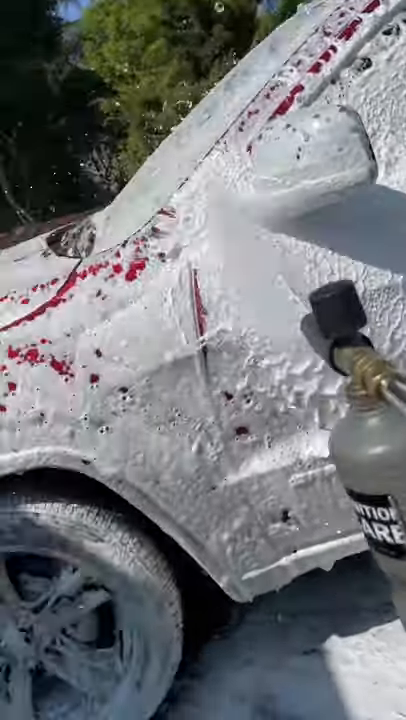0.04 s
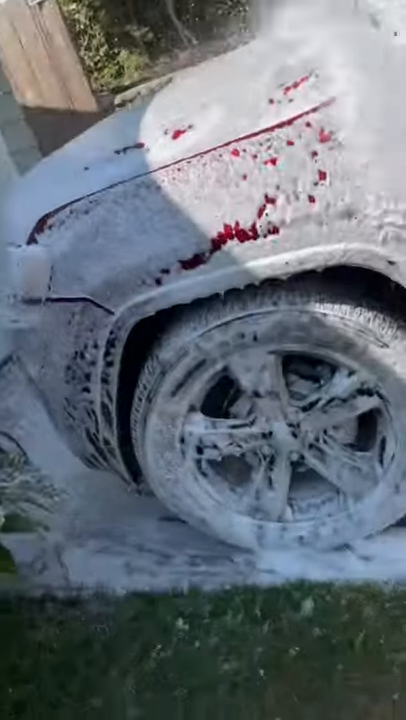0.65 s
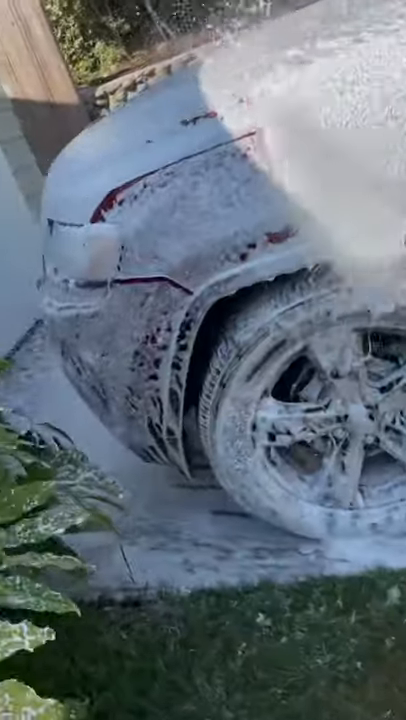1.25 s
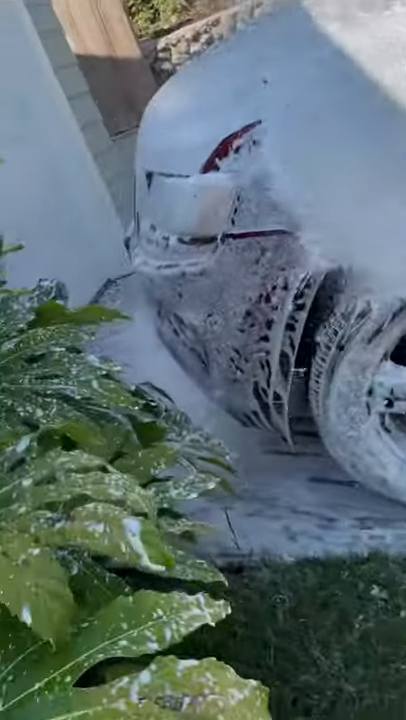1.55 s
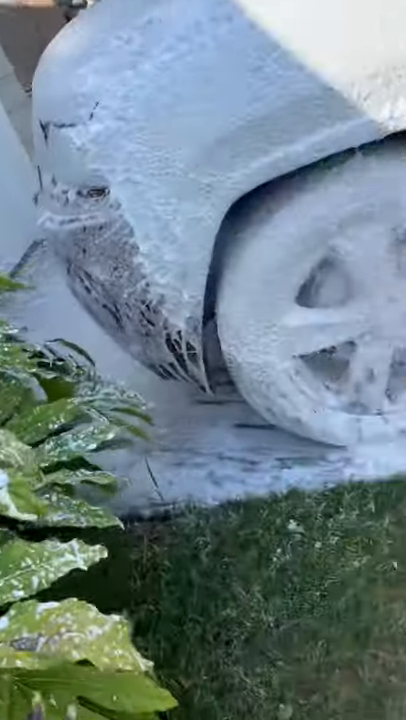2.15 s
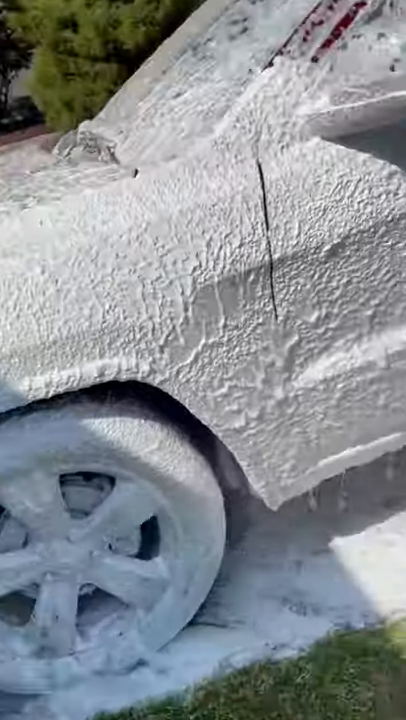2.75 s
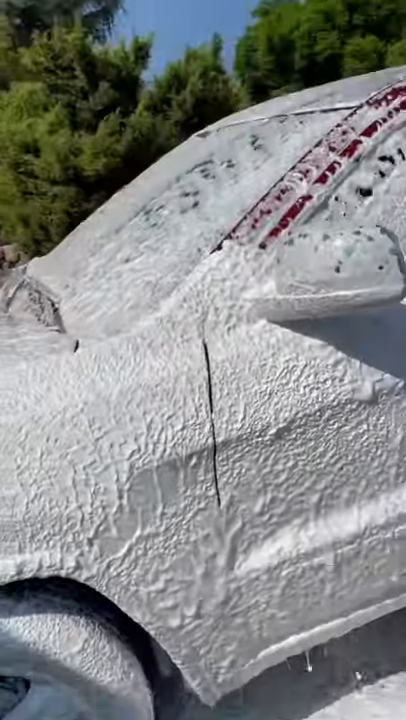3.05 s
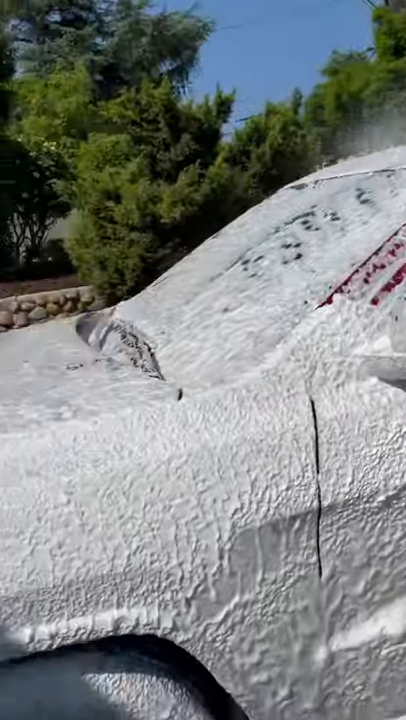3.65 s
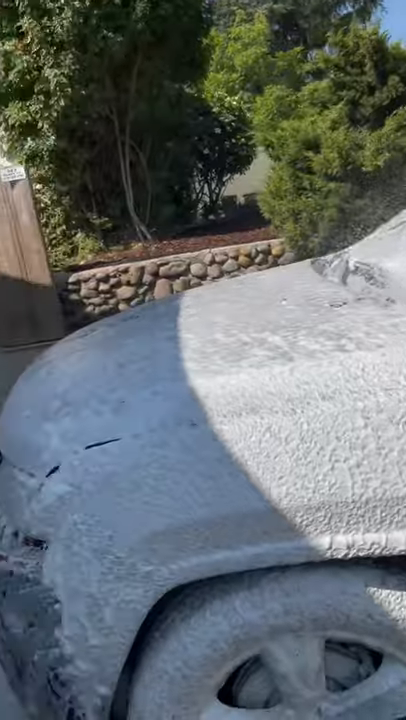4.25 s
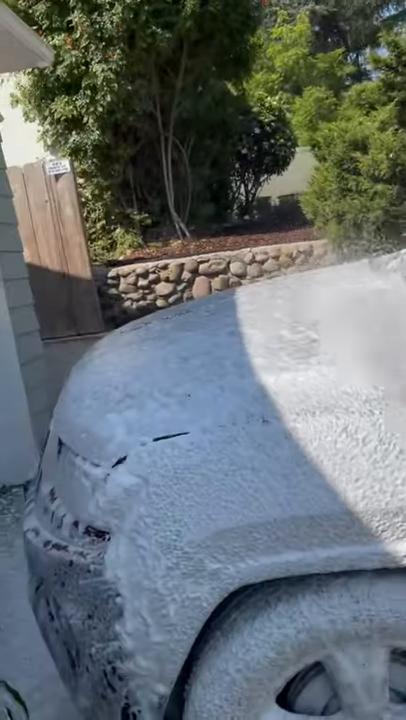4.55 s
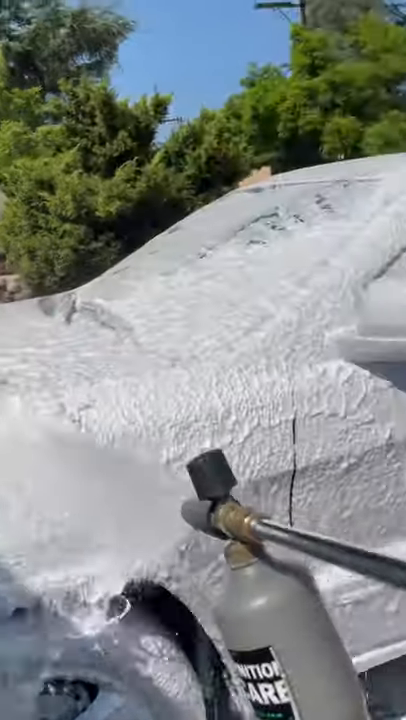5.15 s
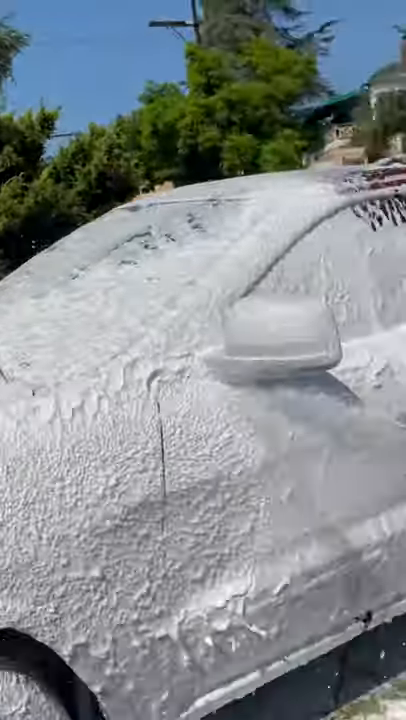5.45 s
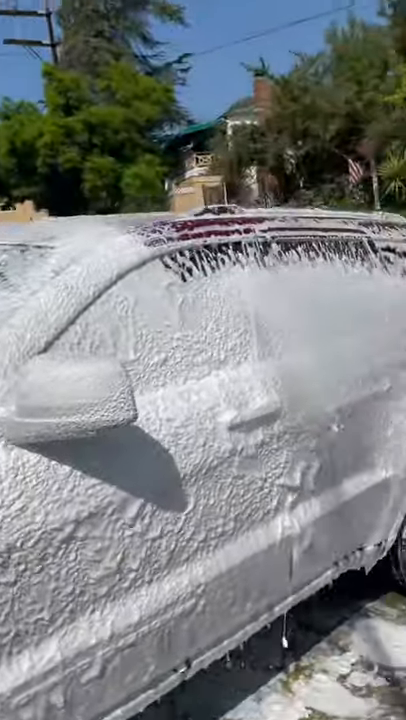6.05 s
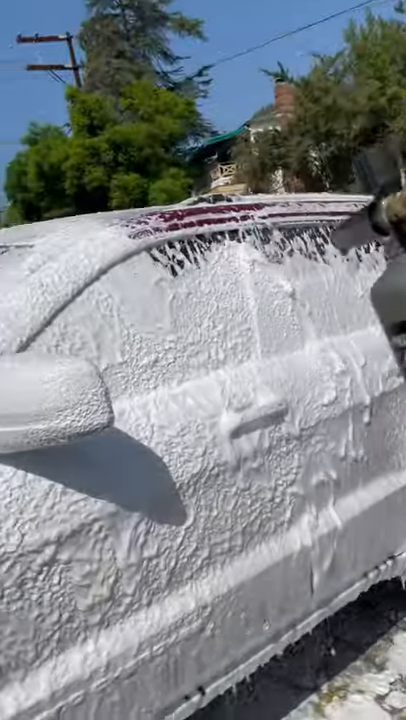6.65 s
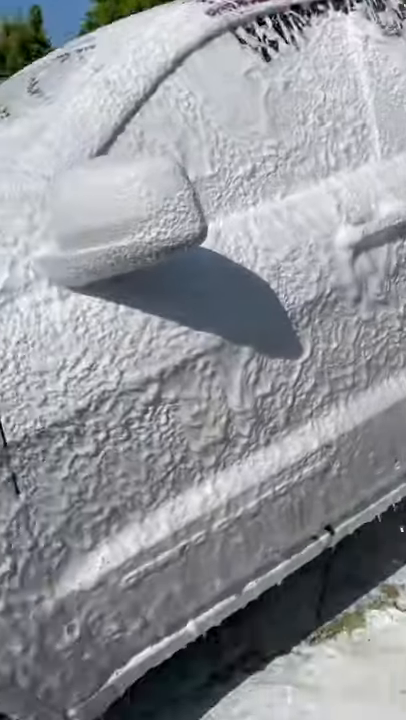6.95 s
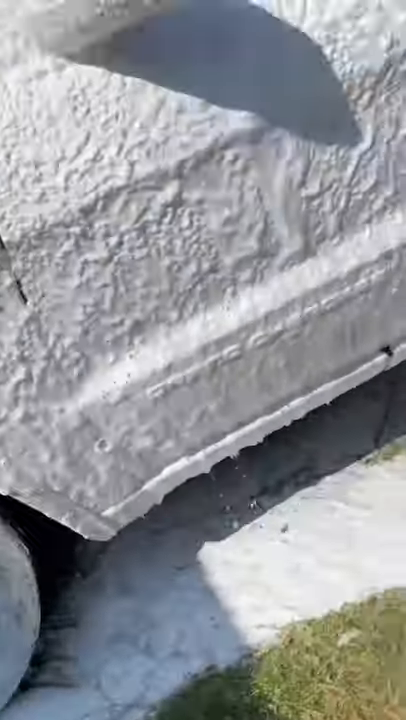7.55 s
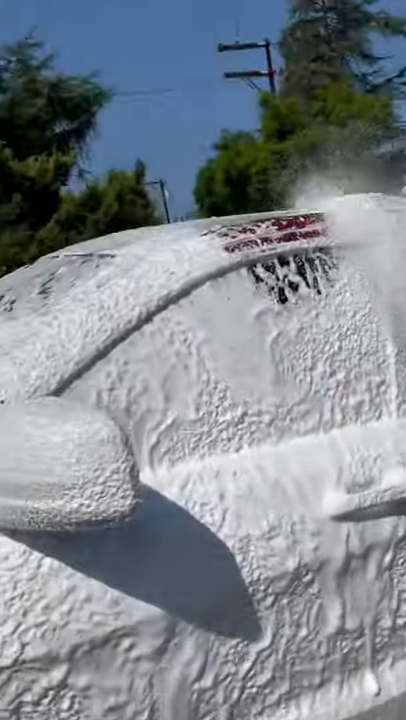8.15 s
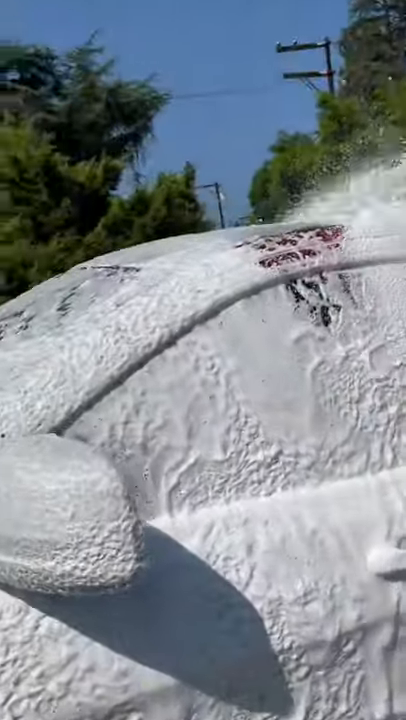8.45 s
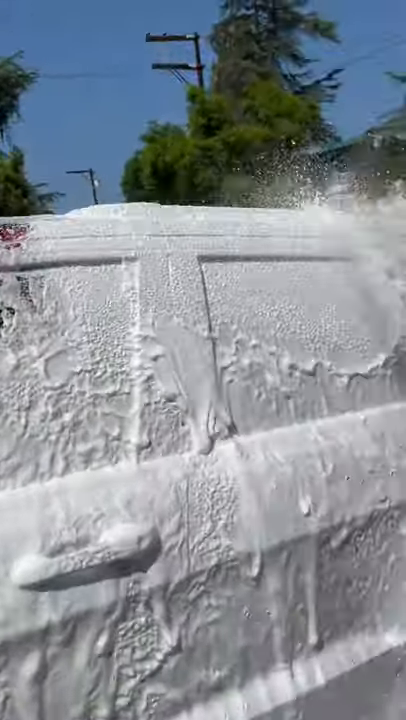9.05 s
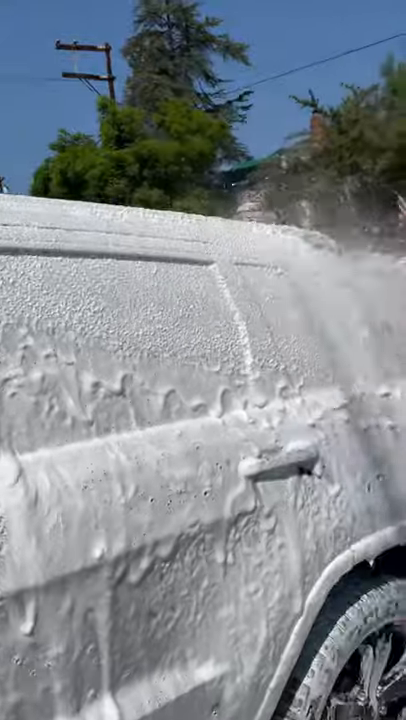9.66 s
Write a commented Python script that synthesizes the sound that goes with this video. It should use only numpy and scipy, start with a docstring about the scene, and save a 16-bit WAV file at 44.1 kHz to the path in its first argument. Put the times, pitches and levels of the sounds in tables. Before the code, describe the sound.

Foam hisses and roars against car panels, stopping twice with a trigger knock while a petrol engine chugs and races.

```python
"""A jet of foam roars and hisses over a car while a petrol pressure washer drones behind it.
The jet rushes through a hand-held lance, drums on the panels and breaks into mist; the one-cylinder
engine chugs and its pump whines. Twice the trigger is let go: the valve knocks, the spray dies away
and the engine, freed of its load, races until the trigger is squeezed again."""
import sys
import numpy as np
from scipy import signal
from scipy.fft import rfft, irfft, next_fast_len
from scipy.io import wavfile
from scipy.ndimage import uniform_filter1d

SR = 44100
rng = np.random.default_rng(int(sys.argv[2]) if len(sys.argv) > 2 else 0)


def materialize(psi):
    """Save the field psi as 16-bit PCM at rate SR to the path in sys.argv[1].

    A 1-D psi becomes a single channel; in a 2-D psi each row is a channel.
    """
    bounded = np.clip(np.atleast_2d(psi).T, -1, 1)
    quanta = np.round(bounded * 32767).astype(np.int16)
    wavfile.write(sys.argv[1], SR, quanta)


N = 431738
TIME = np.arange(N) / SR
SIZE = next_fast_len(N)
FREQS = np.maximum(np.arange(SIZE // 2 + 1) * SR / SIZE, 1)
LOADED_HZ, UNLOADED_HZ = 30.07, 31.72   # engine firings per second
PASS_S = 5.115   # the lance sweeps right past the listener
# Level changes at four places: bonnet, front door, rear door, roof.
ENGINE_BY_PLACE_DB, ROAR_BY_PLACE_DB = (-4, -0.5, 1.5, 2), (0, 1.5, 3, 2.5)


# The hiss changes as the lance swings about: (time [s], nozzle level [dB], mist level [dB])
HISS_LEVELS = [(0, -31, -26.5), (0.4, -31.5, -31), (1.15, -31, -24.5), (1.75, -32, -26),
               (2.25, -36.5, -35.5), (3.2, -35.5, -34.5), (3.65, -31.5, -29), (4.15, -32, -30),
               (4.6, -28, -29.5), (5.05, -23.5, -38), (5.22, -26, -48), (5.43, -31.5, -56),
               (5.52, -30, -43), (5.65, -33.5, -46), (6.3, -32, -36), (8.0, -36, -30), (8.37, -30, -25),
               (8.7, -30.5, -28.5), (9.79, -31.5, -30)]

def spray(cycles):
    """The whole jet, pulsing with the pump; `cycles` counts the engine's firings so far."""
    nozzle_db, mist_db = in_time(HISS_LEVELS)
    splashing = splash()
    sputter = drift(17)
    wash = (roar(cycles) + splashing + flecks()) * from_db([[-.9], [-.1]])   # left, right
    wash *= flow(hold_s=.0052, remaining=.55, fade_s=.14, spurt=.85, drain_per_s=.43, build_s=.15)
    hiss = nozzle(nozzle_db + .5 * sputter) + mist(mist_db + .8 * sputter)
    return stray_echoes(bodywork_echo(wash + hiss * throb(cycles, .026)))

# The tone of the rush inside the foam gun: (frequency [Hz], level [dB])
GUN_SPECTRUM = [(60, -41), (200, -10.5), (450, 0), (800, -1), (1150, -0.5), (1480, 3.5), (1640, 3),
                (1820, 4), (2100, 1), (2600, 0.5), (3200, -4), (5000, -20), (9000, -61)]
# The tone of the broad door panels: (frequency [Hz], level [dB])
DOOR_SPECTRUM = [(100, -24), (300, -11.5), (500, 2.5), (680, -4.5), (900, -0.5), (1450, 1), (1900, -8),
                 (3500, -34)]

def roar(cycles):
    """Foam rushes through the gun and drums on the doors, pushed in pulses by the pump."""
    drumming = from_db(-5) * by_place([0, 1, 1, 1]) * stereo_noise(DOOR_SPECTRUM, grain_db=3)
    gain = from_db(-31 + by_place(ROAR_BY_PLACE_DB) + .5 * drift(5.5))
    rush = stereo_noise(GUN_SPECTRUM, grain_db=1)
    pulsing = throb(cycles, .1) * throb(2 * cycles, .032) * throb(4 * cycles, .03)
    pistons = throb(6 * cycles, .022)   # three pump strokes to each turn of the crank
    return gain * (rush + chamber() + drumming) * pulsing * pistons

# The mixing chamber's note wanders as foam fills it: (time [s], pitch [Hz], level against the rush [dB])
CHAMBER_NOTE = [(0, 1660, -11), (1, 1660, -14), (1.9, 1570, -10), (2.4, 1680, -8.5), (3.5, 1660, -8),
                (4.05, 1568, -9), (4.4, 1610, -5), (4.9, 1692, -7.5), (5.35, 1632, -6), (6.1, 1610, -13),
                (8.4, 1620, -11.5), (9.1, 1630, -9), (9.79, 1600, -16)]

def chamber():
    """The jet keeps the mixing chamber ringing and the brass parts singing faintly."""
    hz, db = in_time(CHAMBER_NOTE)
    return from_db(db) * narrow_band(hz, width_hz=44) + from_db(-21) * narrow_band(2510, width_hz=55)

# The nozzle's tone from a distance: (frequency [Hz], level [dB])
NOZZLE_FAR_SPECTRUM = [(900, -12), (2200, 4.5), (3200, 4.5), (4000, 6.5), (5100, 5), (6000, 4.5),
                       (6700, -3), (8500, -42), (13000, -4.5)]
# The nozzle's tone up close: (frequency [Hz], level [dB])
NOZZLE_NEAR_SPECTRUM = [(1200, -3), (2400, -0.5), (3100, 1.5), (4200, -4), (5000, 1), (5800, 3),
                        (7200, -4.5), (9000, -4), (13000, -5.5), (15700, -2.5)]

def nozzle(level_db):
    """The jet hisses as it leaves the nozzle, changing tone as it passes the listener."""
    near = swell(PASS_S, width_s=.8)
    far_hiss = np.sqrt(1 - near) * stereo_noise(NOZZLE_FAR_SPECTRUM, grain_db=1.44)
    near_hiss = np.sqrt(near) * stereo_noise(NOZZLE_NEAR_SPECTRUM, grain_db=.7, focus=1)
    strength = flow(hold_s=.0079, remaining=.86, fade_s=.087, spurt=.91, drain_per_s=.08, build_s=.14)
    return strength * from_db(level_db) * (far_hiss + near_hiss)

# The tone of the fine mist: (frequency [Hz], level [dB])
MIST_SPECTRUM = [(3000, -20), (5500, -6), (7000, 0), (10500, 0), (13200, -3), (15700, 3)]

def mist(level_db):
    """The jet breaks into mist with a high, flickering hiss."""
    strength = flow(hold_s=.037, remaining=.96, fade_s=.033, spurt=.24, drain_per_s=.08, build_s=.15)
    return strength * from_db(level_db + .77 * drift(19)) * stereo_noise(MIST_SPECTRUM, grain_db=.6)

# The tone of foam landing close by: (frequency [Hz], level [dB])
SPLASH_SPECTRUM = [(1200, -28), (2300, 2), (2900, -2), (3600, 1), (4300, -20), (8000, -36)]

def splash():
    """Foam splashes on the nearest panel just after the lance passes."""
    gain = from_db(-32) * swell(PASS_S + .16, width_s=.22)
    return gain * stereo_noise(SPLASH_SPECTRUM, grain_db=2.5, focus=.64)

# The tone of small slaps of foam: (frequency [Hz], level [dB])
FLECK_SPECTRUM = [(700, -20), (1800, 0), (2800, -3), (5000, -7), (7000, -8), (14000, -7)]

def flecks(hits_per_s=220, spread_db=6, decay_s=.0016):
    """Lumps of foam of uneven size hit the panels in flurries."""
    hits = rng.random(N) < hits_per_s * from_db(3 * np.tanh(drift(7))) / SR
    sizes = hits * from_db(spread_db * np.minimum(rng.exponential(1, N), 2))
    fades = signal.lfilter([1], [1, -np.exp(-1 / (decay_s * SR))], sizes + 1e-18)
    slaps = coloured(fades * rng.standard_normal(N), FLECK_SPECTRUM)
    return from_db(-41 + by_place(ROAR_BY_PLACE_DB)) * slaps

# The car's echo cuts a dip in the hiss: (time [s], frequency [Hz], level change [dB])
HISS_DIP = [(0, 3000, -3), (0.6, 2940, -11), (1.4, 3100, -10), (1.7, 3450, -3), (2.2, 3750, -0.5),
            (3.1, 3050, -3), (3.8, 3250, -2), (4.3, 3880, -4), (5.1, 4200, -2), (5.6, 3850, -2),
            (6.0, 3720, -8), (8.1, 3650, -5), (8.75, 3110, -1), (9.79, 3130, -1)]
# The jet favours one pitch of hiss: (time [s], frequency [Hz], level change [dB])
HISS_BOOST = [(0, 4900, 1.5), (2, 5050, 3), (3.3, 4500, 1), (4.3, 5100, 3), (5.0, 5400, 1.5),
              (5.9, 5170, 3.5), (8.3, 5100, 0.5), (9.79, 5280, 1.5)]

def bodywork_echo(x):
    """A dip and a peak glide through the spray as the lance moves along the panels."""
    hollowed = moving_peak(x, *in_time(HISS_DIP), width_hz=400)
    return moving_peak(hollowed, *in_time(HISS_BOOST), width_hz=320)

def stray_echoes(x, count=8, delay_range_s=(.0008, .007), share=.06):
    """Short echoes off glass, panels and paving come and go, so the tone keeps shifting."""
    lags = (rng.uniform(*delay_range_s, count) * SR).astype(int)
    echoes = sum(drift(1.5) * np.roll(x, lag, axis=-1) for lag in lags)
    return (x + share * echoes) / np.sqrt(1 + count * share ** 2)

def flow(hold_s, remaining, fade_s, spurt, drain_per_s, build_s):
    """Jet strength, 0-1: it drops and fades when let go, then spurts and builds up when squeezed."""
    strength = np.ones(N)
    for let_go, _, squeezed, _ in SPRAY_PAUSES:
        age = TIME - let_go - hold_s
        dying = np.where(age < 0, 1, remaining * np.exp(-np.maximum(age, 0) / fade_s))
        first_spurt = spurt * np.exp(-drain_per_s * (squeezed - let_go))   # the idle gun drains
        building = 1 - (1 - first_spurt) * np.exp(-np.maximum(TIME - squeezed, 0) / build_s)
        strength *= np.where(TIME < squeezed, dying, building)
    return strength


# The trigger stops the spray: (let-go time [s], knock level [dB], squeeze time [s], knock level [dB])
SPRAY_PAUSES = [(2.532, -20.5, 3.0296, -18.5), (6.332, -17.5, 7.925, -16)]
# The notes of the knocked lance: (pitch [Hz], level [dB], fade time [s])
LANCE_NOTES = [(685, -11, 0.024), (903, 2, 0.024), (1040, -5, .015), (1690, -20, 0.011)]
# Trigger and valve ticks: (time [s], level [dB], pitch [Hz], fade time [s], pitch spread [ratio])
TRIGGER_TICKS = [(2.531, -17, 1900, .014, 0.92), (2.628, -28, 2920, .016, 1),
                 (3.0277, -38, 4000, .012, 1.8), (3.0385, -28, 3500, 0.014, 1.1),
                 (6.327, -22, 2400, .014, 1.12), (6.331, -18, 1500, .012, 1.25),
                 (6.4215, -25, 4500, 0.017, 1.4), (7.9233, -24.5, 4700, .014, 1.15),
                 (7.9323, -22, 5000, 0.0072, 1.7), (7.595, -29, 1280, .05, 1.1)]

def trigger():
    """The trigger ticks, and each sudden change of pressure knocks through the lance."""
    shut = impulses([row[:2] for row in SPRAY_PAUSES])
    opened = impulses([row[2:] for row in SPRAY_PAUSES])
    knocks = sum(from_db(db) * (ring(opened, hz, t60) + ring(shut, hz * 1.01, t60))   # higher on shutting
                 for hz, db, t60 in LANCE_NOTES)
    # In the second pause the shut lance rings on briefly under the trapped pressure.
    groan = from_db(-38) * swell(6.58, width_s=.05) * narrow_band(955, width_hz=30)
    ticks = sum(burst(*row) for row in TRIGGER_TICKS)
    return knocks + groan + ticks

# The notes of the lance's brass parts: (pitch [Hz], level [dB], fade time [s])
BRASS_NOTES = [(1310, -5, .13), (1660, -8, .09), (2530, 0, .06), (3140, 0, .055), (4420, -10, .03),
               (5150, -8, .04), (5700, -7, .05)]
# The brass parts tap together in the hand: (time [s], level [dB], favoured pitch [Hz])
BRASS_TAPS = [(6.766, -31, 1310), (6.797, -32, 2530), (6.81, -33, 1400), (6.829, -31, 1700),
              (6.839, -33, 1900), (6.864, -29, 1490), (6.868, -36, 5300), (6.8952, -33, 3200),
              (6.9285, -30, 2510), (6.961, -33, 3620), (6.989, -39, 2700)]

def clinks(loss_db_per_octave=12):
    """Each tap starts with a short scrape and rings the brass notes, favouring those near its pitch."""
    ringing = np.zeros(N)
    for hz, note_db, t60 in BRASS_NOTES:
        taps = [(s, db + note_db - loss_db_per_octave * abs(np.log2(hz / favoured_hz)))
                for s, db, favoured_hz in BRASS_TAPS]
        ringing += ring(impulses(taps), hz, t60)
    scrapes = sum(burst(s, db - 6, hz, t60=.035, spread=1.65) for s, db, hz in BRASS_TAPS)
    return ringing + scrapes


def engine(cycles, speed):
    """A one-cylinder, four-stroke engine and its pump; `speed` is in firings per second."""
    load = np.clip((31.1 - speed) / .81, 0, 1)   # the speed rises as the load falls away
    exhaust = boom(cycles, speed) * from_db([[.3], [-.3]])
    exhaust += chug(cycles, speed, load) * from_db([[1.5], [-1.5]])
    machinery = from_db(by_place(ENGINE_BY_PLACE_DB)) * (rattle(cycles, load) + clatter(cycles))
    return machinery + whine(cycles, load) + rumble(cycles, speed) - exhaust

# The exhaust's boom under load, along the walk: (time [s], level [dB])
BOOM_LEVELS = [(0, -24), (1.0, -23.5), (1.6, -25), (2.5, -23.5), (3.55, -22), (4.6, -23), (5.3, -22.5),
               (6.35, -21), (8.4, -22), (9.79, -22.7)]

def boom(cycles, speed, throttle_lag_s=.065, drop_db_per_hz=1.76):
    """The exhaust booms at the crank's rate, two turns a firing; it softens as the throttle shuts."""
    boom_db, = in_time(BOOM_LEVELS)
    extra_hz = np.interp(TIME - throttle_lag_s, TIME, speed) - LOADED_HZ
    return np.sqrt(2) * from_db(boom_db + .6 - drop_db_per_hz * extra_hz) * np.cos(4 * np.pi * cycles)

# The exhaust's higher tones, by place and with no load:
# (pitch [times the firing rate], bonnet [dB], front door [dB], rear door [dB], roof [dB], no load [dB])
EXHAUST_TONES = [(3, -40.5, -38.5, -32.5, -32.5, -33), (4, -34, -30.5, -33.5, -34, -44.5),
                 (5, -41.5, -42, -39, -32, -41.5), (6, -36.5, -35.5, -32, -43, -38.5),
                 (7, -39.5, -42, -30.5, -41, -46), (8, -53, -50, -51, -45, -43.5),
                 (9, -47.5, -37.5, -42, -39, -40.5), (10, -48.5, -45.5, -54, -45, -40),
                 (11, -50.5, -41.5, -46, -34, -52), (12, -50, -52, -38, -40, -43.5),
                 (13, -40, -40.5, -31, -38, -41), (14, -62, -58, -51, -61, -49),
                 (15, -46.5, -41.5, -41, -41, -45), (16, -47, -38, -34, -36.5, -43),
                 (17, -51, -48, -48, -39, -57), (18, -44.5, -41, -47, -40, -65),
                 (19, -49, -48, -50, -45, -59), (20, -53, -46, -39, -53, -56)]

def chug(cycles, speed, load):
    """The lower exhaust tones stay in step and add up to one chug per firing."""
    racing = np.clip(speed - 32, 0, 1)
    shake = .05 + .03 * (1 - load) + .9 * racing   # racing with the throttle shut, it fires unevenly
    total = np.zeros(N)
    for multiple, *levels_db in EXHAUST_TONES:
        gain = tone_gain(multiple, levels_db, load) * (1 + shake * drift(10.5))
        total += gain * engine_tone(cycles, multiple, wander_db=1, scatter=min(.093 * multiple, 1))
    return total

# The pump's and gears' tones, by place and with no load:
# (pitch [times the firing rate], bonnet [dB], front door [dB], rear door [dB], roof [dB], no load [dB])
PUMP_TONES = [(21, -57, -62, -49, -52, -51), (23, -50, -56, -54, -46, -58), (24, -46, -43, -56, -46, -54),
              (26, -53, -59, -42.5, -55, -62), (27, -55, -49, -41, -42, -51), (30, -57, -55, -46, -64, -48),
              (32, -56, -43, -45, -42, -48), (36, -53.5, -51, -44, -49, -57), (38, -51, -49, -39, -49, -52),
              (42, -45, -45, -47, -46, -51), (43, -49, -49, -49, -59, -70), (44, -58, -49, -48, -52, -54),
              (48, -58, -41, -53, -40, -69), (50, -58, -43, -47, -53, -72), (52, -57, -48, -40, -56, -69),
              (54, -54, -48, -39.5, -41, -74), (56, -43, -53, -44, -54, -74)]

def whine(cycles, load):
    """The pump and gears whine in step with the engine."""
    return sum(tone_gain(multiple, levels_db, load) * engine_tone(cycles, multiple, wander_db=1.64)
               for multiple, *levels_db in PUMP_TONES)

def engine_tone(cycles, multiple, wander_db, scatter=1):
    """One tone; echoes off the car and house shift its timing and make it swell and fade."""
    gain = from_db(wander_db * drift(.52))
    return gain * np.cos(2 * np.pi * (multiple * cycles + scatter * (rng.random() - .5)))

def tone_gain(multiple, levels_db, load):
    """A tone's strength depends on place and load; three tones also hum in the passing lance."""
    *loaded_db, unloaded_db = levels_db
    loaded = by_place(from_db(loaded_db))
    unloaded = by_place(from_db(unloaded_db + np.array(ENGINE_BY_PLACE_DB)))
    hum = from_db(-45) * swell(PASS_S, width_s=.3) if multiple in (13, 16, 24) else 0
    return load * loaded + (1 - load) * unloaded + hum

# The tone of the engine's clatter: (frequency [Hz], level [dB])
CLATTER_SPECTRUM = [(25, -3), (70, 3), (180, -3.5), (450, -2.5), (590, -3.5), (820, 0), (1000, 0.5),
                    (1400, -1.5), (1750, -6.5), (2700, -5), (3700, -13), (4800, -12.5), (8000, -28),
                    (13000, -28), (15700, -37)]

def clatter(cycles):
    """Engine noise that throbs with each firing and each turn of the crank."""
    pulsing = throb(cycles, .083) * throb(2 * cycles, .036)
    return from_db(-37) * stereo_noise(CLATTER_SPECTRUM, grain_db=1) * pulsing

# The tone of the rattling valves and pump: (frequency [Hz], level [dB])
RATTLE_SPECTRUM = [(400, -5), (650, -1), (950, 5), (1550, 2.5), (2000, -1.5), (3000, -10), (6000, -46)]

def rattle(cycles, load):
    """The engine's valves and the pump repeat the same ragged pattern every firing."""
    pattern = rng.standard_normal(512)
    repeated = np.interp(cycles % 1, np.linspace(0, 1, len(pattern)), pattern)
    return from_db(-42.5 - .5 * load) * coloured(repeated, RATTLE_SPECTRUM)

# The tone of the exhaust's rough rumble: (frequency [Hz], level [dB])
RUMBLE_SPECTRUM = [(50, -20), (110, 2), (250, 0), (420, -3), (560, -15), (1000, -39)]

def rumble(cycles, speed, full_hz_per_s=13.7):
    """The engine fires raggedly while it gains or loses speed."""
    change_hz_per_s = uniform_filter1d(np.abs(np.gradient(speed)) * SR, size=SR // 12)
    gain = from_db(-37) * np.minimum(change_hz_per_s / full_hz_per_s, 1)
    return gain * throb(cycles, .5) * stereo_noise(RUMBLE_SPECTRUM, grain_db=2.5)

# Pops in the muffler: (time [s], level [dB], pitch [Hz])
MUFFLER_POPS = [(6.549, -25, 400), (6.581, -28, 360), (6.611, -20, 380), (6.655, -22, 90)]

def muffler_pops():
    """The muffler pops softly as the throttle closes in the second pause."""
    return sum(burst(s, db, hz, t60=.049, spread=1.1) for s, db, hz in MUFFLER_POPS)

def governor(unload_lag_s=.02493, swing_s=.53, settle_s=.426, hose_fill_s=.16, reload_s=.1092):
    """Firings per second: in each pause the speed control overshoots and swings until the load returns."""
    speed = np.full(N, LOADED_HZ)
    for let_go, _, squeezed, _ in SPRAY_PAUSES:
        age = np.maximum(TIME - let_go - unload_lag_s, 0)
        swing = 1 - np.exp(-age / settle_s) * np.cos(2 * np.pi * age / swing_s)
        unloaded = 1 - np.clip((TIME - squeezed - hose_fill_s) / reload_s, 0, 1)
        speed += (UNLOADED_HZ - LOADED_HZ) * swing * unloaded
    return speed


# The walk along the car: (time [s], place [0 bonnet, 1 front door, 2 rear door, 3 or more roof])
WALK_PATH = [(0, 0), (2.5, 0.2), (3.3, 1), (5.2, 1), (5.6, 1.6), (7.7, 1.1), (8.2, 5), (8.62, 3.5),
             (8.9, 2), (9.79, 2)]

def by_place(values):
    """Blend four values, one for each place, along the walk."""
    return np.interp(in_time(WALK_PATH)[0], np.arange(len(values)), values)

def from_db(db):
    """Turn decibels into a multiplier."""
    return 10 ** (np.asarray(db) / 20)

def unit_power(x):
    """Scale a signal to an average power of 1."""
    return x / np.sqrt(np.mean(x ** 2) + 1e-20)

def in_time(rows):
    """Read a table's columns at every sample."""
    times, *columns = np.transpose(rows)
    return [np.interp(TIME, times, column) for column in columns]

def in_frequency(rows):
    """Read a table's columns at every frequency."""
    hz, *columns = np.transpose(rows)
    return [np.interp(np.log(FREQS), np.log(hz), column) for column in columns]

def drift(rate):
    """A smooth random wobble of size about 1 that changes about `rate` times a second."""
    step, warm_up = 40, 2000
    r = np.exp(-2 * np.pi * rate * step / SR)
    noise = rng.standard_normal(N // step + warm_up + 2)
    slow = signal.lfilter([1], [1, -2 * r, r * r], noise)[warm_up:]
    return np.interp(np.arange(N) / step, np.arange(len(slow)), unit_power(slow))

def swell(peak_s, width_s):
    """A smooth rise from 0 to 1 and back."""
    return np.exp(-((TIME - peak_s) / width_s) ** 2)

def throb(cycles, sharpness):
    """One smooth hump per cycle, averaging 1."""
    hump = np.exp(sharpness * np.cos(2 * np.pi * cycles))
    return hump / hump.mean()

def coloured(x, spectrum):
    """Shape a signal's tone with a spectrum table, at power 1."""
    return unit_power(irfft(rfft(x, SIZE) * from_db(in_frequency(spectrum)[0]), SIZE)[..., :N])

def stereo_noise(spectrum, grain_db, focus=0):
    """Noise of countless uneven impacts; more `focus` makes it more alike in both ears."""
    sizes = from_db(grain_db * drift(370))
    mid, side = rfft(rng.standard_normal((2, N)) * sizes, SIZE)
    alike = np.clip(1 - (1 - focus) * (1 - in_frequency(STEREO_IMAGE)[0]), 0, 1)
    pair = np.sqrt(1 + alike) * mid + np.sqrt(1 - alike) * side * [[1], [-1]]
    return unit_power(irfft(pair * from_db(in_frequency(spectrum)[0]), SIZE)[:, :N])

def narrow_band(hz, width_hz):
    """A half-whistling note, kept ringing by swirling flow."""
    phase = 2 * np.pi * np.cumsum(hz * np.ones(N)) / SR
    return drift(width_hz) * np.cos(phase) + drift(width_hz) * np.sin(phase)

def moving_peak(x, hz, db, width_hz):
    """Raise or lower a band around a moving frequency."""
    carrier = np.exp(2j * np.pi * np.cumsum(hz) / SR)
    r = np.exp(-np.pi * width_hz / SR)
    band = 2 * np.real(signal.lfilter([(1 - r) / 2] * 2, [1, -r], x * carrier.conj()) * carrier)
    return x + (from_db(db) - 1) * band

def impulses(rows):
    """Single clicks from rows of (time [s], level [dB])."""
    clicks = np.zeros(N)
    for s, db in rows:
        clicks[round(s * SR)] = from_db(db)
    return clicks

def ring(clicks, hz, t60):
    """Each click starts a pure note; the fade time `t60` is the seconds it takes to fall 60 dB."""
    r, angle = 10 ** (-3 / (t60 * SR)), 2 * np.pi * hz / SR
    return signal.lfilter([0, np.sin(angle)], [1, -2 * r * np.cos(angle), r * r], clicks + 1e-18)

def burst(s, db, centre_hz, t60, spread):
    """A dying puff of noise around one pitch."""
    start, size, ratio = round(s * SR), SR // 5, max(spread, 1.1)
    band = signal.butter(1, [centre_hz / ratio, centre_hz * ratio], "band", fs=SR, output="sos")
    noise = unit_power(signal.sosfilt(band, rng.standard_normal(size)))
    puff = np.zeros(N)
    puff[start:start + size] = noise * from_db(db - 60 * np.arange(size) / SR / t60)
    return puff


def scene():
    """Spray, trigger and engine in the open air."""
    speed = governor()
    unloaded = np.clip((speed - LOADED_HZ) / (UNLOADED_HZ - LOADED_HZ), 0, 1)
    wobble_hz = (.024 + .035 * unloaded) * drift(6.1)   # without its load the engine runs less evenly
    cycles = np.cumsum(speed + wobble_hz) / SR
    background = muffler_pops() + engine(cycles, speed)
    return spray(cycles) + trigger() + clinks() + background

# Stereo image by pitch: how alike and how far out of step left and right sound:
# (frequency [Hz], likeness [0-1], left's phase lead [rad])
STEREO_IMAGE = [(100, .999, 0), (300, .96, -.3), (700, .88, -.85), (1150, .84, -.65), (1550, .97, 0),
                (2200, .93, -.1), (3200, .15, -.6), (4200, .45, 1.4), (5000, .55, .4), (6200, .72, 1.5),
                (6750, .8, 2), (7200, .97, 3.05), (8100, .97, 3.25), (9300, .7, 4.8), (10500, .95, 6.2),
                (11700, .95, 6.4), (12600, .65, 7.5), (13400, .96, 9.3), (14900, .96, 9.5),
                (15700, .7, 10.3)]

def record(dry):
    """Left and right sound slightly out of step, and the highest treble is cut off."""
    lead = in_frequency(STEREO_IMAGE)[1]
    pair = irfft(rfft(dry, SIZE) * np.exp(.5j * lead * [[1], [-1]]), SIZE)[:, :N]
    return signal.sosfilt(signal.ellip(10, .1, 80, 15900, fs=SR, output="sos"), pair)


dry = scene()
out = record(dry)
materialize(out)
```